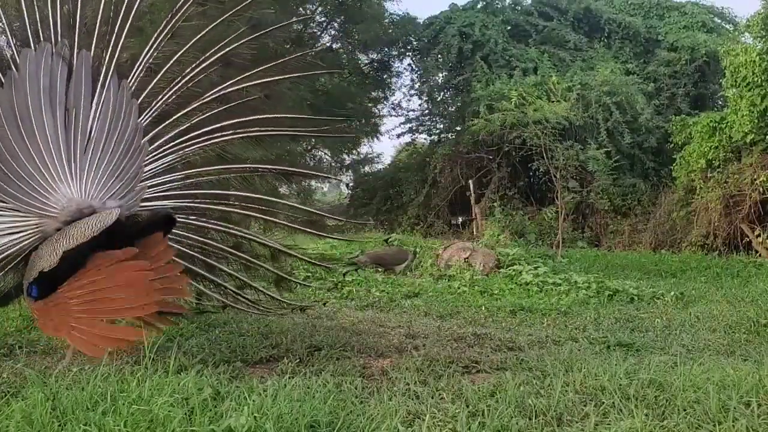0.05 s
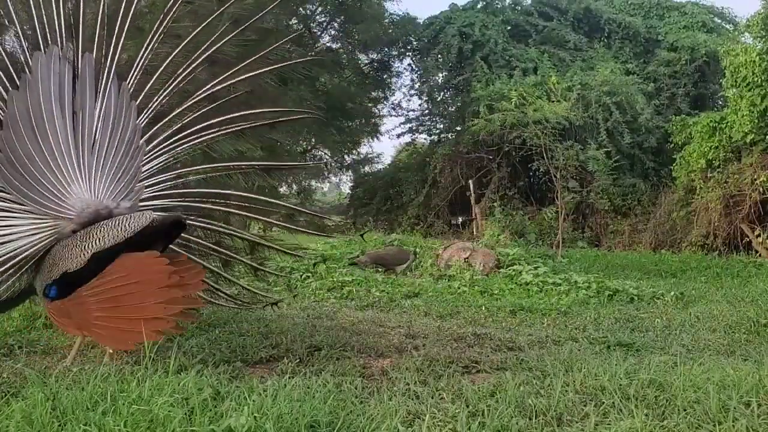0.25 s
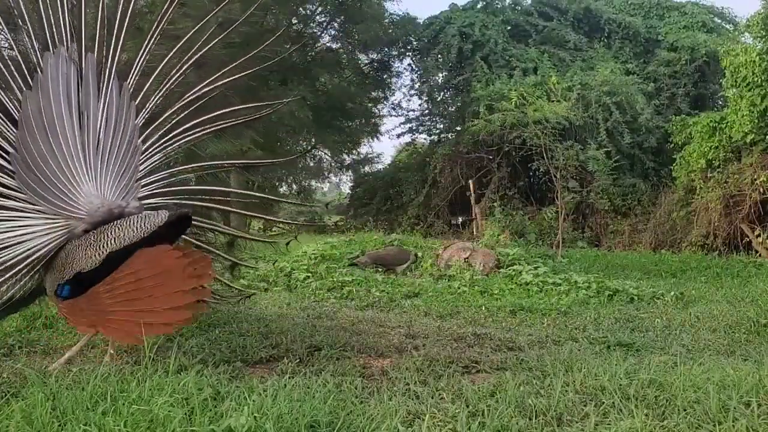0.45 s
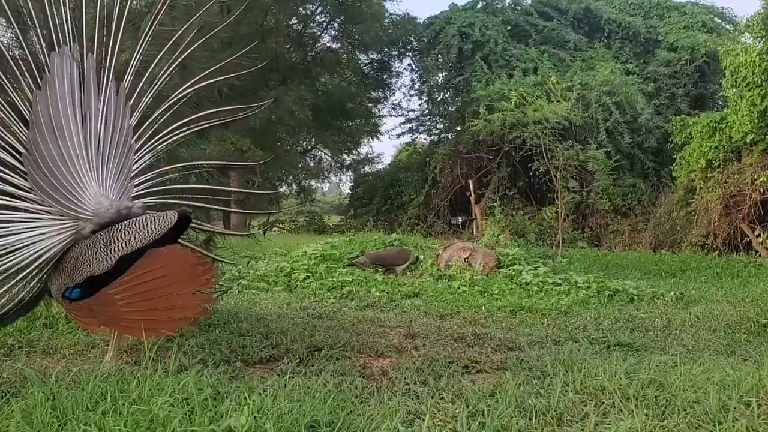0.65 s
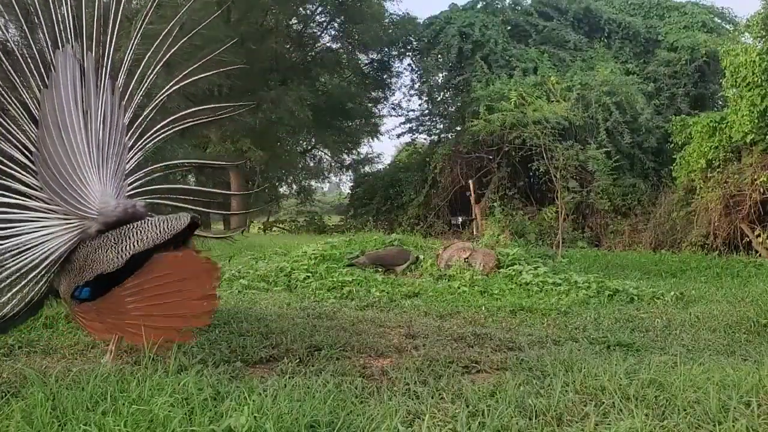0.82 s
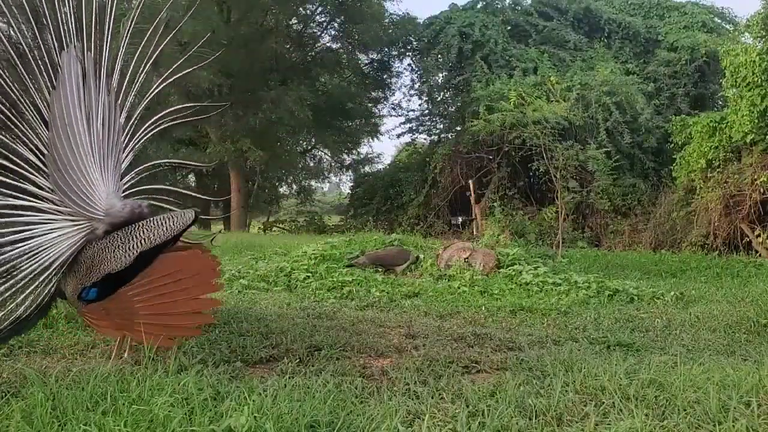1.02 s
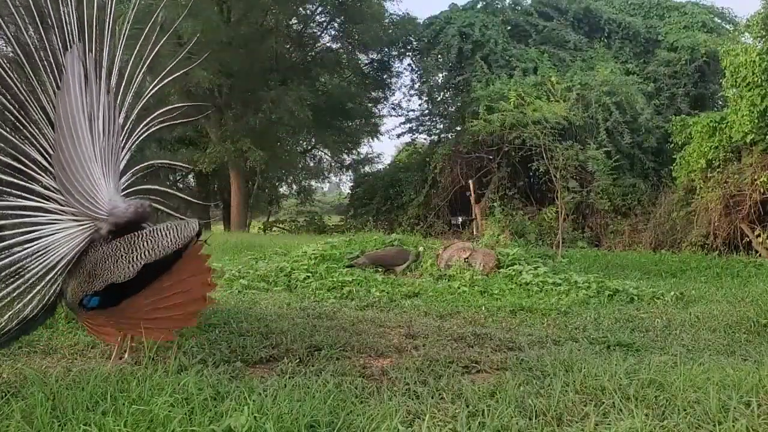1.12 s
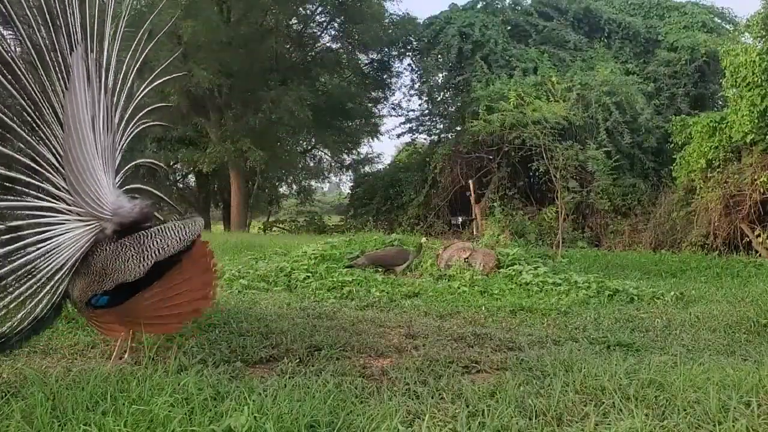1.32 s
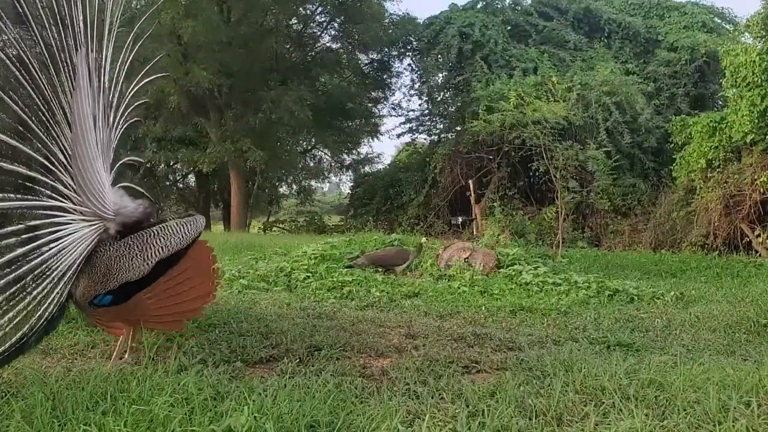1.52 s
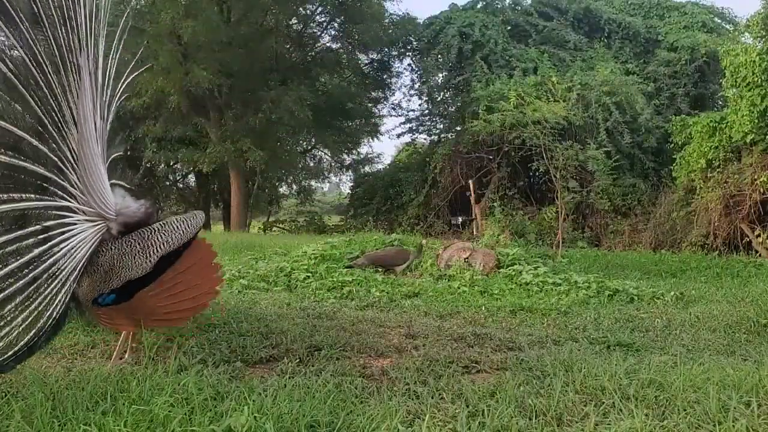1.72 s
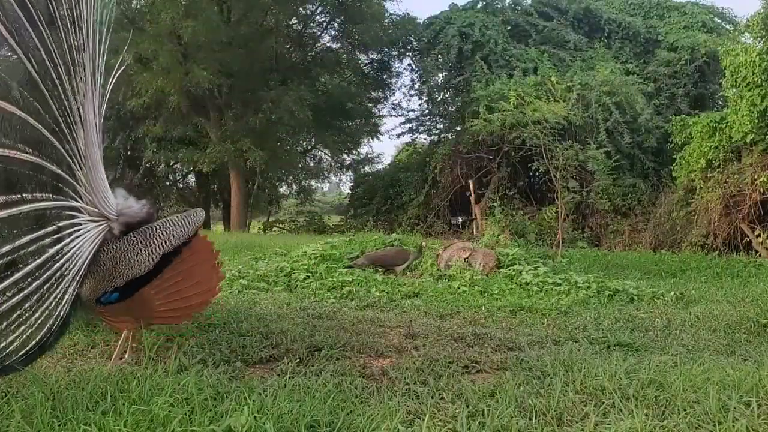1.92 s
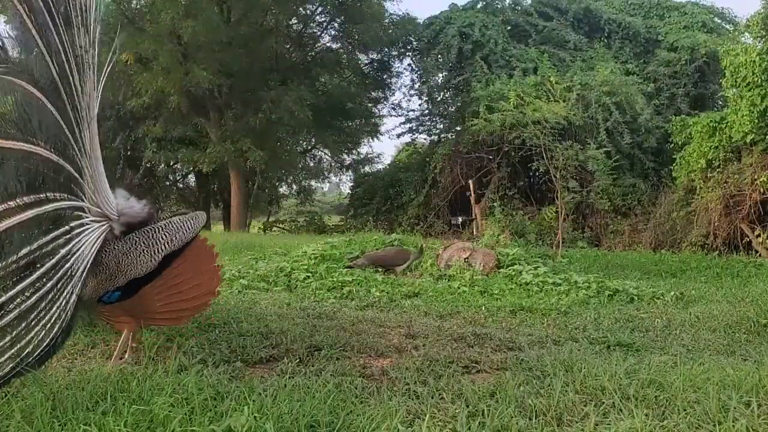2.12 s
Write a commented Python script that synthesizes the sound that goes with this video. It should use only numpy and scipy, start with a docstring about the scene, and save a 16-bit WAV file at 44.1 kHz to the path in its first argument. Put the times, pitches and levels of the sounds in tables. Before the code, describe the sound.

Outdoors on a lawn, a clear bird chirp, one flat note then a falling one, repeats four times over fading feather rustle, dull soft wing puffs, faint far twitter, wind rumble and low microphone bumps.

```python
"""Peacock on a lawn

Feathers rustle faintly as a peacock turns with its train spread: noise grains, ticks and short strokes.
Its wings flap softly in dull puffs of noise; a bird repeats a short flat note and a falling one, as sines.
Other birds twitter far off in the trees: gliding tones, echoed and partly blurred by decaying noise.
Light wind, as low noise, rumbles mostly on the left port of the microphone, with a few soft one-cycle
bumps, over a faint outdoor floor of noise."""
import sys
import numpy as np
from scipy import signal
from scipy.fft import rfft, irfft, next_fast_len
from scipy.io import wavfile
from scipy.ndimage import uniform_filter1d, map_coordinates

SR = 44100
rng = np.random.default_rng(int(sys.argv[2]) if len(sys.argv) > 2 else 0)


def int16_out(signal):
    """Quantize to a 16-bit WAV file."""
    q = np.round(np.clip(np.atleast_2d(signal).T, -1, 1) * 32767)
    wavfile.write(sys.argv[1], SR, q.astype(np.int16))


N = 94815

# Steady feather rustle, before RUSTLE_GAIN_DB: time_s, level_db
RUSTLE_LEVEL = [(0.0, -64), (0.15, -66.5), (0.3, -76.5), (0.46, -74.5), (0.93, -71), (1.12, -74.5),
                (2.15, -84)]
# Brief feather strokes: start_s, length_s, level_db
FEATHER_STROKES = [(.008, 0.034, -57.5), (0.055, 0.0067, -56), (0.08, 0.11, -71.5), (0.119, 0.0065, -64),
                   (0.264, 0.12, -64), (0.301, 0.019, -56.5), (0.369, 0.049, -65), (0.468, 0.0054, -65),
                   (0.475, 0.049, -67.5), (0.556, 0.068, -68.5), (0.596, 0.019, -63), (0.755, 0.042, -65),
                   (0.78, 0.049, -68), (0.958, 0.021, -68), (1.35, 0.046, -70.5), (1.789, 0.064, -71)]
# Relative spectrum of the feathers: frequency_hz, level_db
FEATHER_SPECTRUM = [(530, -53), (900, -2.5), (1130, -4.5), (1700, 1), (2080, 0), (2460, -0.5), (2640, -2.5),
                    (2840, -4), (3320, -7.5), (3520, -6), (4420, -4), (5960, -1), (8430, -10.5), (15100, 0),
                    (15700, -17)]
RUSTLE_GAIN_DB, GRAIN_SWING_DB = 1, 1
TICKS_PER_S, TICK_DB = 90, 19.5  # dry ticks of quills, level over the scraping

# Soft flaps of the wings: start_s, length_s, level_db
WING_FLAPS = [(.005, 0.05, -60), (0.098, 0.022, -56), (0.175, 0.012, -59), (0.289, 0.021, -62),
              (0.315, 0.016, -53), (0.385, 0.032, -62.5), (0.479, 0.0082, -65), (0.57, 0.057, -66.5),
              (0.654, 0.065, -66), (0.758, 0.028, -59), (0.788, 0.037, -63), (0.833, 0.043, -58.5),
              (0.953, 0.01, -60), (1.041, 0.043, -59.5)]
# Soft swish of the wings between flaps: time_s, level_db
WING_SWISH = [(0, -63.5), (.3, -65.5), (.45, -75), (1.0, -69), (1.35, -66.5), (1.6, -75), (2.15, -77.5)]
# Relative spectrum of the wings: frequency_hz, level_db
WING_SPECTRUM = [(100, -4.5), (250, 3), (420, 1), (600, -4.5), (850, -21.5), (1400, -28.5), (3000, -32)]
WING_SIDE_DB = -8  # left-right difference signal relative to the common one

# Two-note chirps: start_s, flat_note_db, falling_note_db, fall_length_s, fall_depth_hz, left_over_right_db
TWO_NOTE_CHIRPS = [(0.248, -57.5, -56.5, 0.064, 680, -1), (0.821, -58, -59.5, 0.078, 816, 1.2),
                   (1.430, -59.5, -56.5, .066, 632, 0), (2.014, -64, -57, 0.067, 657, .1)]
FLAT_HZ, FLAT_SAG_HZ, FALL_START_HZ = 2530, 72.4, 2488
FLAT_S, SECOND_NOTE_S = 0.0224, 0.04  # glide of the first note; start of the second after the first
FLAT_ATTACK_S, FLAT_RELEASE_S = 0.005, 0.0035
FALL_ATTACK_S, FALL_RELEASE_S, FALL_FADE_DB = 0.009, 0.018, 14
FALL_CURVE_RAD = 1.3  # stretch of the squared sine that shapes the falling pitch
LEFT_LEAD_S = 0.00008  # the direct chirps reach the left port first
CHIRP_ECHO_DB = -11.5

# Distant notes, peak level before FAR_GAIN_DB:
# start_s, length_s, start_hz, end_hz, level_db, roughness_0_to_1, left_lead_rad
DISTANT_NOTES = [(0.031, 0.056, 2430, 2294, -64.5, .1, 4), (0.056, 0.064, 2881, 2890, -60.5, 0.15, 3.5),
                 (0.176, 0.03, 1748, 1640, -70.5, 0.43, -1.5), (0.232, 0.019, 3750, 2920, -70, 0.24, 5),
                 (0.248, 0.031, 3980, 3880, -73, .2, 1.5), (0.496, 0.035, 1277, 1170, -65, 0.17, -2),
                 (0.499, 0.028, 4830, 5050, -68.5, 0.26, 1), (0.503, 0.042, 2400, 2520, -64, 0.86, 4),
                 (0.634, 0.043, 3020, 2910, -62.5, .3, 2.5), (0.654, .022, 2520, 2720, -68, 0.33, 1),
                 (0.669, 0.061, 2860, 2815, -60.5, .12, 3), (0.677, 0.022, 2657, 2463, -63, 0.34, 2),
                 (0.722, 0.034, 1328, 1200, -72, 0.19, -1.8), (0.961, 0.14, 1603, 1560, -70, 0.46, 3.5),
                 (1.044, 0.073, 2616, 1726, -68.5, 0.89, 1.3), (1.135, 0.03, 4590, 4420, -70.5, .4, 1),
                 (1.167, 0.027, 3120, 2350, -68.5, 0.5, 2.5), (1.197, 0.098, 4400, 3964, -70.5, 0.4, 1.5),
                 (1.253, 0.06, 2936, 2827, -68.5, 0.33, 2), (1.298, 0.15, 5290, 5240, -71.5, 1, -2.5),
                 (1.367, 0.025, 2680, 2597, -69, 0.45, 4.5), (1.539, 0.017, 4200, 4140, -69, 0.1, 0.9),
                 (1.567, 0.036, 4150, 3850, -68, 0.58, 1.45), (1.632, 0.062, 3500, 2933, -71, 1, 4),
                 (1.679, 0.023, 2270, 1940, -73, 0.48, 0.5), (1.697, 0.027, 4100, 3820, -66, 0.28, -2.5),
                 (1.7, 0.032, 4920, 4860, -69.5, 0.62, 2), (1.712, 0.049, 3200, 3110, -73.5, 0.4, 0),
                 (1.736, .02, 3760, 5100, -67, 0.4, 4), (1.747, 0.04, 4350, 3560, -72, .55, 1.5),
                 (1.838, 0.12, 4150, 4140, -72.5, .4, 1.3), (1.85, 0.052, 2870, 2850, -71, 0.2, 3.5),
                 (1.916, 0.093, 2880, 2730, -76, 0.2, 4), (2.004, 0.039, 3940, 3770, -74, 0.18, -1.5),
                 (2.033, 0.016, 4230, 4060, -73, 0.2, -1.5), (2.048, 0.015, 3780, 3580, -67.5, .1, -2.1),
                 (2.06, 0.036, 3100, 2870, -68, 0.25, 3)]
FAR_GAIN_DB, FAR_ECHO_DB = 2.5, -7
ROUGH_HZ, FAR_BLUR_S = 320.5, 0.0066  # pitch spread at roughness 1; decay constant of the blur

# Reverberation time of the foliage: frequency_hz, t60_s
FOLIAGE_T60 = [(500, 0.049), (2300, 0.31), (6000, 0.12)]

# Gust strength, before WIND_GAIN_DB and panning: time_s, level_db
WIND_LEVEL = [(0, -53.5), (.08, -51.5), (.2, -48.5), (.25, -41.5), (.33, -48.5), (.39, -57.5), (.55, -47),
              (.63, -52.5), (.7, -44.5), (.77, -54), (.84, -44), (.89, -60), (.97, -53.5), (1.01, -41),
              (1.07, -49.5), (1.15, -53.5), (1.24, -40), (1.36, -38), (1.54, -40.5), (1.61, -53.5),
              (1.68, -45.5), (1.76, -45.5), (1.82, -39.5), (1.9, -48), (2.05, -51), (2.15, -62.5)]
# Balance of the wind between the ports: time_s, left_over_right_db
WIND_BALANCE = [(0, -1), (.25, 8), (.4, -0.5), (.55, 10), (.9, 3), (1.1, 16), (1.5, 10.5), (1.85, 5),
                (2.15, -4)]
# Relative spectrum of the wind rumble: frequency_hz, level_db
RUMBLE_SPECTRUM = [(12, -45), (20, -24.5), (32, -8.5), (50, 4), (70, -0.5), (123, -14), (182, -27.5),
                   (247, -28), (330, -46.5), (660, -85.5)]
WIND_GAIN_DB = 2

# Bumps on the microphone: centre_time_s, frequency_hz, left_peak_db
MICROPHONE_BUMPS = [(0.673, 68.5, -31.5), (1.101, 71, -22.5), (1.1, 172, -30.5), (1.219, 209, -31),
                    (1.2362, 206, -18.5), (1.251, 101, -27.5), (1.267, 166, -32), (1.296, 211, -21.5),
                    (1.299, 96, -21), (1.391, 187, -32.5), (1.412, 56.3, -21), (1.799, 70, -27.5)]
BUMP_CYCLES, BUMP_LEFT_OVER_RIGHT_DB = 0.66, 33  # the first sets the half length of a bump

# Relative spectrum of the outdoor floor: frequency_hz, level_db
FLOOR_SPECTRUM = [(200, -29), (600, 4), (1100, -7.5), (1600, -3), (2300, 5), (2900, 1.5), (3500, -2.5),
                  (4500, 6), (5500, -1), (6800, -6.5), (7500, -17.5), (11000, -7), (15500, -1)]
FLOOR_DB = -69.5

TOP_HZ = 15780  # band limit


def amp(db):
    """Logarithmic levels: decibels to amplitude gain."""
    return 10 ** (np.asarray(db) / 20)


def unit(x):
    """Power normalisation: scale to rms 1."""
    return x / np.sqrt(np.mean(x ** 2) + 1e-20)


def along(points, hz):
    """Logarithmic frequency axis: interpolate between (Hz, value) points."""
    f, v = np.transpose(points)
    return np.interp(np.log(hz + 1), np.log(f + 1), v)


def curve(rows):
    """Piecewise linear envelope: one value per sample from (s, value) rows."""
    return np.interp(np.arange(N) / SR, *np.transpose(rows))


def wobble(rate):
    """Slow random modulation: a smooth curve through random knots, rate of them a second."""
    knots = rng.standard_normal(N // 8)
    return map_coordinates(knots, [np.arange(N) * rate / SR], mode="wrap")


def filtered(x, response):
    """Linear filtering: multiply the spectrum of x by a response of frequency."""
    size = next_fast_len(N + SR // 2)
    spectrum = rfft(x, size) * response(np.fft.rfftfreq(size, 1 / SR))
    return irfft(spectrum, size)[..., :N]


def noise(spectrum):
    """Incoherent sources: independent coloured noise on the two ports."""
    white = rng.standard_normal((2, N))
    return unit(filtered(white, lambda hz: amp(along(spectrum, hz))))


def gate(t, length, attack, release):
    """Amplitude envelope: sine attack, hold and squared-sine release."""
    rise = np.sin(np.pi / 2 * np.clip(t / attack, 0, 1))
    fall = np.sin(np.pi / 2 * np.clip((length - t) / release, 0, 1)) ** 2
    return rise * fall


def add_events(power, events):
    """Incoherent addition: add the power of short (s, length s, dB) events."""
    t = np.arange(N) / SR
    for start, length, db in events:
        power = power + (amp(db) * gate(t - start, length, length / 3, length / 2)) ** 2
    return power


def tone(hz):
    """Frequency modulation: a sine of rms 1 whose phase integrates the pitch."""
    return np.sqrt(2) * np.sin(2 * np.pi * np.cumsum(hz) / SR)


def panned(x, db):
    """Interaural-style level difference: mono to stereo, db of left over right."""
    return x * amp([[db / 2], [-db / 2]])


def trees(x):
    """Diffuse reverberation: foliage echoes as noise decaying at a rate set by frequency."""
    hz, t, z = signal.stft(rng.standard_normal((2, SR // 2)), SR, nperseg=256)
    decay = np.exp(-np.log(1000) * t / along(FOLIAGE_T60, hz)[:, None])
    tail = signal.istft(z * decay, SR, nperseg=256)[1]
    tail = tail / np.linalg.norm(tail[0])
    delayed = np.pad(x, (SR // 100, 0))  # 10 ms before the echo begins
    return signal.fftconvolve(delayed[None], tail, axes=1)[:, :N]


def feathers(grain_rate=1300):
    """Friction noise: barbs scrape in tiny grains and quills tick, in a fading rustle and brief strokes."""
    rustle = amp(curve(RUSTLE_LEVEL) + RUSTLE_GAIN_DB + 1.3 * wobble(25.8)) ** 2
    power = add_events(rustle, FEATHER_STROKES)
    grains = rng.standard_normal((2, N)) * amp(GRAIN_SWING_DB * wobble(grain_rate))
    tick_here = rng.random(N) < TICKS_PER_S / SR
    ticks = tick_here * rng.standard_normal(N) * amp(TICK_DB)
    scrape = unit(filtered(grains + ticks, lambda hz: amp(along(FEATHER_SPECTRUM, hz))))
    return np.sqrt(power) * scrape


def wings():
    """Air displacement: each flap pushes a short dull puff, nearly alike on both ports."""
    swish = amp(curve(WING_SWISH) + 4.62 * wobble(60)) ** 2
    power = add_events(swish, WING_FLAPS)
    mid, side = noise(WING_SPECTRUM) * np.sqrt(power) * amp([[0], [WING_SIDE_DB]])
    return np.array([mid + side, mid - side])


def chirps(waver_hz=14, flutter_db=2.26, fall_flutter_db=2):
    """Pitch glide: a nearly flat whistle, then one that swells, falls and grows unsteady as it fades."""
    out = np.zeros((2, N))
    for start, flat_db, fall_db, fall_s, drop_hz, pan in TWO_NOTE_CHIRPS:
        t = np.arange(N) / SR - start
        fall_t = t - SECOND_NOTE_S
        flat_part = np.clip(t / FLAT_S, 0, 1)
        fall_part = np.clip(fall_t / fall_s, 0, 1)
        waver = waver_hz * wobble(250)

        flat_gate = gate(t, FLAT_S + FLAT_RELEASE_S / 2, FLAT_ATTACK_S, FLAT_RELEASE_S)
        flat_hz = FLAT_HZ - FLAT_SAG_HZ * flat_part + waver
        flat = amp(flat_db) * flat_gate * tone(flat_hz)

        fall_level = fall_db - FALL_FADE_DB * fall_part ** 2 + fall_flutter_db * fall_part * wobble(250)
        fall_gate = gate(fall_t, fall_s + FALL_RELEASE_S / 2, FALL_ATTACK_S, FALL_RELEASE_S)
        glide = (np.sin(FALL_CURVE_RAD * fall_part) / np.sin(FALL_CURVE_RAD)) ** 2  # S-shaped, 0 to 1
        fall_hz = FALL_START_HZ - drop_hz * glide + (1 + fall_part) * waver
        fall = amp(fall_level) * fall_gate * tone(fall_hz)

        out += panned((flat + fall) * amp(flutter_db * wobble(150)), pan)
    ports = np.array([[1], [-1]])
    direct = filtered(out, lambda hz: np.exp(1j * np.pi * hz * LEFT_LEAD_S * ports))
    return direct + amp(CHIRP_ECHO_DB) * trees(out.mean(0))


def far_birds(flutter_db=2):
    """Multipath propagation: faint gliding notes, the rough ones blurred by many paths through the trees."""
    out = np.zeros((2, N))
    blur_t = np.arange(SR // 16) / SR
    for start, length, start_hz, end_hz, db, rough, lead in DISTANT_NOTES:
        t = np.arange(N) / SR - start
        hz = np.interp(t, [0, length], [start_hz, end_hz]) + rough * ROUGH_HZ * wobble(1200)
        phase = 2 * np.pi * np.cumsum(hz) / SR + np.array([[lead / 2], [-lead / 2]])
        note = amp(db) * gate(t, length, length / 4, length / 5) * np.sin(phase)
        paths = rng.standard_normal(SR // 16) * np.exp(-blur_t / FAR_BLUR_S)
        paths = paths / np.linalg.norm(paths)
        blur = signal.fftconvolve(note, paths[None], axes=1)[:, :N]
        share = np.clip(rough, 0, 1)
        out += np.sqrt(1 - share ** 2) * note + share * blur
    out = out * amp(FAR_GAIN_DB + flutter_db * wobble(160))
    return out + amp(FAR_ECHO_DB) * trees(out[0])


def wind():
    """Turbulent pressure: gusts buffet the two ports separately, the stronger ones mostly the left."""
    rumble = noise(RUMBLE_SPECTRUM)
    # Even out the rumble over 40 ms so that the gust curve sets its level
    local_power = np.abs(uniform_filter1d(rumble ** 2, size=SR // 25, axis=1))
    rumble = rumble / np.sqrt(local_power + 0.00041)
    pan = curve(WIND_BALANCE)
    return rumble * amp(curve(WIND_LEVEL) + WIND_GAIN_DB + np.array([pan, -pan]) / 2)


def bumps():
    """Pressure pulses: dull pushes, about one cycle long, almost wholly on the left port."""
    out = np.zeros(N)
    for centre, hz, db in MICROPHONE_BUMPS:
        cycles = (np.arange(N) / SR - centre) * hz
        envelope = 1 / (1 + (cycles / BUMP_CYCLES) ** 2 / 2) ** 3
        push = -np.sin(2 * np.pi * cycles) * envelope
        out += amp(db) * push / np.abs(push).max()
    return out * amp([[0], [-BUMP_LEFT_OVER_RIGHT_DB]])


def outdoor_floor():
    """Ambient noise: a steady coloured hiss, unrelated between the ports."""
    return amp(FLOOR_DB) * noise(FLOOR_SPECTRUM)


def scene():
    """Superposition: feathers, wings, birds and wind add over the outdoor floor."""
    peacock = feathers() + wings()
    birds = chirps() + far_birds()
    return peacock + birds + wind() + bumps() + outdoor_floor()


def record(dry):
    """Band limiting: nothing is kept from TOP_HZ upward."""
    return filtered(dry, lambda hz: hz < TOP_HZ)


dry = scene()
out = record(dry)
int16_out(out)
```